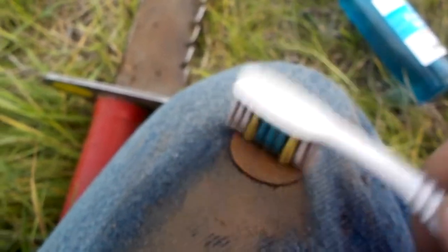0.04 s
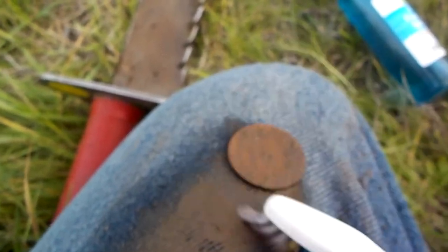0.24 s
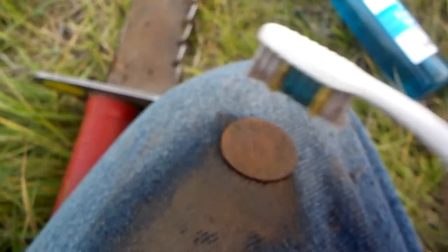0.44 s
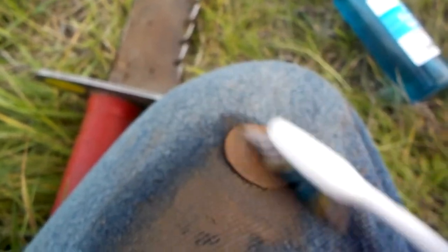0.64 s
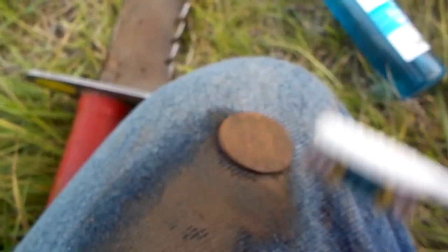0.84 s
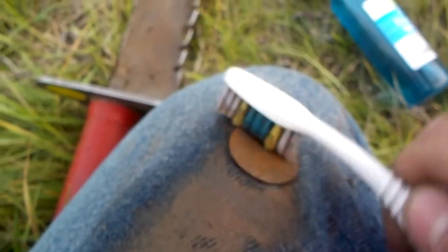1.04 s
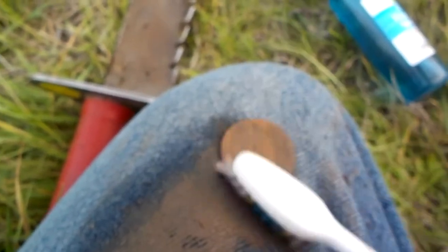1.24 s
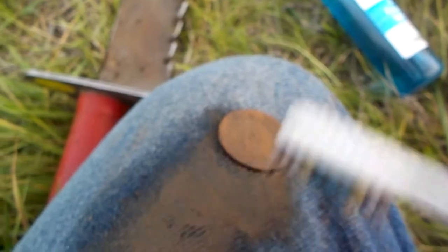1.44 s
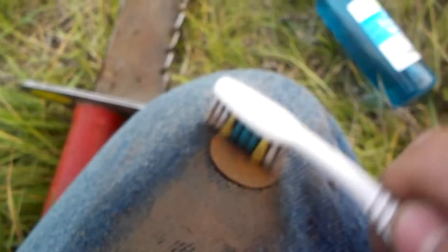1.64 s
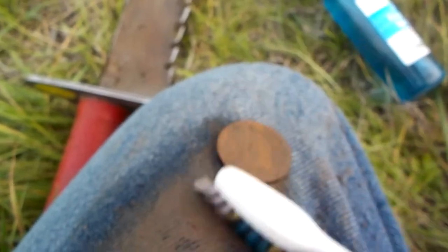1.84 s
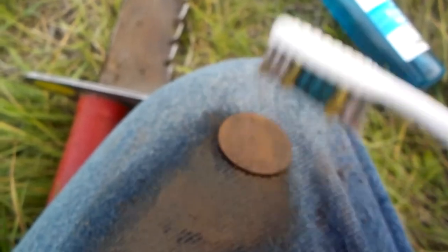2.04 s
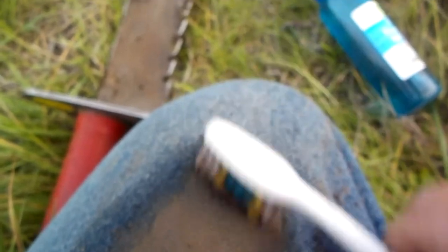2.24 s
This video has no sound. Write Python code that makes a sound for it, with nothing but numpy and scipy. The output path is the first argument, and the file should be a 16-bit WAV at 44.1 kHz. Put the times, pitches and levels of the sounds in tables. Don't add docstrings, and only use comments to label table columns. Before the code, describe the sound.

A toothbrush scrubs a small metal token on a denim-covered knee: four raspy strokes, each starting with a light tick and stopping abruptly, with a few sharp rim clicks. Close stereo microphones, quiet open field, faint hiss.

```python
import sys
import numpy as np
from scipy import signal
from scipy.fft import rfft, irfft, next_fast_len
from scipy.io import wavfile
from scipy.ndimage import uniform_filter1d

SR = 44100
rng = np.random.default_rng(int(sys.argv[2]) if len(sys.argv) > 2 else 0)


def inscribe(sig):
    pcm = np.round(np.clip(np.atleast_2d(sig).T, -1, 1) * 32767)
    wavfile.write(sys.argv[1], SR, pcm.astype(np.int16))


def convert_level_to_amplitude(level_db):
    exponent = np.asarray(level_db, float) / 20
    return 10 ** exponent


N = 101429

# frequency in Hz, level in dB per Hz.
CLOTH = [(150, -37), (350, -33.5), (700, -15), (1200, -4), (1600, -0.5), (2250, 2.5), (3000, -23.5),
         (5000, -25)]
# frequency in Hz, level in dB per Hz.
BRISTLE = [(2000, -40), (3100, -13.5), (3700, -7.5), (4300, 4), (4800, 2), (5600, -1.5), (6600, -4),
           (7800, -23)]
# frequency in Hz, level in dB per Hz.
FIZZ = [(5000, -26.5), (7900, -17.5), (9000, -3.5), (11500, -2), (13000, -3), (14700, 1.5), (15600, -1.5),
        (17000, -9.5)]


def rms_one(x):
    return x / np.sqrt(np.mean(x ** 2) + 1e-20)


def at_hz(points, hz):
    f, *columns = np.transpose(points)
    return [np.interp(np.log(hz + 1), np.log(f), column) for column in columns]


def white():
    return rng.standard_normal(N)


def drift(rate_hz):
    r = np.exp(-2 * np.pi * rate_hz / SR)
    slow = signal.lfilter([1], [1, -2 * r, r * r], rng.standard_normal(N + SR))
    return rms_one(slow[SR:])


def grains(per_s, spread_db):
    sizes = convert_level_to_amplitude(spread_db * np.minimum(rng.exponential(1, N), 3))
    signs = rng.choice([-1, 1], N)
    happens = rng.random(N) < per_s / SR
    return rms_one(sizes * signs * happens)


def colour(x, spectrum):
    size = 4096
    gain = convert_level_to_amplitude(at_hz(spectrum, np.fft.rfftfreq(size, 1 / SR))[0])
    cepstrum = irfft(np.log(rms_one(gain)))
    cepstrum[1:size // 2] *= 2
    cepstrum[size // 2 + 1:] = 0
    response = irfft(np.exp(rfft(cepstrum)))
    return signal.fftconvolve(x, response)[:N]


def pair(x, other, table):
    size = next_fast_len(N + 4096)
    db, phase, alike = at_hz(table, np.fft.rfftfreq(size, 1 / SR))
    alike = np.clip(alike, 0, 1)
    mid = np.sqrt((1 + alike) / 2) * rfft(x, size)
    side = np.sqrt((1 - alike) / 2) * rfft(other, size)
    turn = convert_level_to_amplitude(db / 2) * np.exp(.5j * phase)
    return irfft([(mid + side) / turn, (mid - side) * turn], size)[:, :N]


def ring(clicks, hz, t60):
    r, w = convert_level_to_amplitude(-60 / (t60 * SR)), 2 * np.pi * hz / SR
    return signal.lfilter([0, np.sin(w)], [1, -2 * r * np.cos(w), r * r], clicks + 1e-18)


def stroke_motion():
    # time in seconds, scrub level in dB, pressure into the knee in dB.
    strokes = [
        [(0.186, -70, -10), (0.192, -58.5, -2.5), (0.228, -53, -2), (0.236, -47.5, -6.5), (0.258, -52, -4.5),
         (0.27, -48, -7.5), (0.34, -49, 3), (0.408, -53, -4.5), (0.425, -92, -6)],
        [(0.626, -68, -5), (0.656, -62, -7), (0.678, -61.5, 1), (0.688, -54, -1), (0.798, -45.5, -1.5),
         (0.892, -51, 3), (0.92, -52.5, -5.5), (0.933, -80.5, -20)],
        [(1.15, -59, -6), (1.154, -68.5, 0), (1.24, -53, -6), (1.316, -51, 2), (1.344, -51.5, -4),
         (1.45, -51, 5), (1.502, -49.5, -6.5), (1.518, -59, 9), (1.528, -112, -12)],
        [(1.752, -67, 4), (1.762, -64.5, -7), (1.804, -54, 2.5), (1.902, -48.5, -7.5), (1.924, -51, -2.5),
         (2.028, -47, 1), (2.054, -53.5, -0.5), (2.066, -108, 19)],
        [(2.29, -68.5, 5.5), (2.3, -63, -1)],
    ]
    stroke_tips_db = [0.1, 0.1, 1, 0.11, 0.1]
    spring_db, spring_t60_s, spring_press_db = -35, 0.75, 2
    slow_ends_db = 5.5
    t = np.arange(N) / SR
    level_db, press_db, tips_db = np.full(N, -120.), np.zeros(N), np.zeros(N)
    for rows, tip_db in zip(strokes, stroke_tips_db):
        s, db, press = np.transpose(rows)
        before, during = t < s[0], t <= s[-1]
        after_db = db.max() + spring_db - 60 * (t - s[-1]) / spring_t60_s
        stroke_db = np.where(during, np.interp(t, s, db), after_db)
        stroke_press_db = np.where(during, np.interp(t, s, press), spring_press_db)
        along = np.clip(2 * (t - s[0]) / (s[-1] - s[0]) - 1, -1, 1)
        level_db = np.where(before, level_db, stroke_db)
        press_db = np.where(before, press_db, stroke_press_db)
        tips_db = np.where(before, tips_db, tip_db - slow_ends_db * along ** 2)
    return level_db, press_db, tips_db


def scrub(rim_snags):
    # frequency in Hz, level in dB per Hz.
    flesh = [(250, -19.5), (500, -5), (800, 2), (1200, 0), (1800, -14), (3000, -44)]
    slips_per_s, slip_spread_db, clump_db, clump_hz = 9000, 1.5, 1.33, 86.5
    flicks_per_s, flick_spread_db, flick_db = 1200, -1, -11
    cloth_db, bristle_db, fizz_db, knee_db = 1, -0.5, -3.5, -16
    fizz_follows, tips_press, knee_press = 0.97, 0.18, 0.63

    level_db, press_db, tips_db = stroke_motion()
    swing = drift(clump_hz)
    clump = convert_level_to_amplitude(clump_db * (swing - uniform_filter1d(swing, size=1500)))
    flicks = convert_level_to_amplitude(flick_db) * grains(flicks_per_s, flick_spread_db)

    def slips():
        return clump * grains(slips_per_s, slip_spread_db)

    cloth_drive = convert_level_to_amplitude(cloth_db + level_db + press_db) * (slips() + flicks)
    bristle_drive = convert_level_to_amplitude(bristle_db + level_db) * (slips() + flicks)
    fizz_level_db = fizz_db + tips_db + tips_press * press_db - 49.5 + fizz_follows * (level_db + 50.5)
    fizz_drive = convert_level_to_amplitude(fizz_level_db) * slips()
    knee_level_db = knee_db + level_db + knee_press * np.clip(press_db, -12, 4)
    knee_drive = convert_level_to_amplitude(knee_level_db) * (slips() + flicks)
    cloth = colour(cloth_drive + rim_snags, CLOTH)
    bristle = colour(bristle_drive + rim_snags, BRISTLE)
    return cloth + colour(knee_drive, flesh) + bristle + colour(fizz_drive, FIZZ)


def snags():
    # time in seconds, peak in dB.
    catches = [
        (0.2758, -31),
        (0.6903, -43),
        (0.802, -25),
        (0.8034, -25),
        (0.8724, -58),
        (1.191, -41),
        (1.4578, -30),
        (1.8018, -26),
        (1.9694, -30),
    ]
    s, db = np.transpose(catches)
    out = np.zeros(N)
    out[(s * SR).astype(int)] = convert_level_to_amplitude(db - 5)
    return out


def ticks():
    # start in seconds, level in dB, brightness in dB, swell in seconds.
    landings = [
        (.152, -53, 0.5, 0.003),
        (.157, -62, -2, 0.0095),
        (.1898, -61, -5, 0.0018),
        (0.6167, -46.5, 0, .0015),
        (.6895, -46.5, -2, .002),
        (1.1412, -55.5, 2, .003),
        (1.7425, -45, -1, .0015),
        (2.073, -60, -30, .005),
        (2.283, -56, -2, 0.0028),
    ]
    fade_s, tips_db, low_cut_hz = 0.0024, -14, 870
    heel_db, heel_softens_db_per_s = 24, 3000
    t, out = np.arange(N) / SR, 0
    cut = signal.butter(2, low_cut_hz, "high", fs=SR, output="sos")
    for s, db, bright_db, length in landings:
        swell = np.clip((t - s) / length, 0, 1)
        shape = swell * np.exp(-np.maximum(t - s - length, 0) / fade_s)
        touch = shape * white()
        touch[int((s + length) * SR)] = convert_level_to_amplitude(heel_db - heel_softens_db_per_s * length)

        def even(x):
            return x * np.sqrt(np.sum(shape ** 2) / np.sum(x ** 2))

        low = even(signal.sosfilt(cut, colour(touch, CLOTH)))
        mid = even(colour(touch, BRISTLE))
        high = even(colour(touch, FIZZ))
        out = out + convert_level_to_amplitude(db) * (low + convert_level_to_amplitude(bright_db) * (mid + convert_level_to_amplitude(tips_db) * high))
    return out


def brush():
    # frequency in Hz, right over left in dB, phase in radians, likeness from 0 to 1.
    sideways = [(400, -1, .05, .88), (1100, -.6, .08, .985), (2400, -2, .3, .95), (3100, 5, .1, .5),
                (4300, 2.5, .25, .97), (6300, 0, .9, .84), (7500, 0, .3, .95), (9300, 0, 1.2, .76),
                (11400, 5.5, 2.2, .89), (12800, 5.5, 1.4, .7), (15000, 3.3, 1.3, .91)]
    return pair(scrub(snags()) + ticks(), scrub(0), sideways)


def field():
    # frequency in Hz, level in dB per Hz.
    air = [(30, -35), (60, -49), (100, -22.5), (250, -8), (600, -1), (1100, -1), (2200, -3), (3200, -21)]
    # frequency in Hz, level in dB per Hz.
    hiss = [(300, -1), (2500, 8), (3300, 2.5), (4400, 5.5), (6000, 1.5), (9500, 0), (13000, 3.5),
            (16000, 3)]
    # frequency in Hz, width in Hz, level in dB.
    engine = [(96.8, 5.9, -89.5), (201.6, 12.4, -87)]
    # frequency in Hz, right over left in dB, phase in radians, likeness from 0 to 1.
    open_air = [(100, -1.5, 0.0087, 1), (564, -1.5, 0.028, 0.6), (1830, -1, 0.013, 0.87), (2550, 1.5, 0, 0),
                (4830, -0.5, 0.013, 0.33), (15000, 0, 0, 0.44)]
    air_db, hiss_db, patchy_db, patch_hz = -66.5, -68.5, 0.98, 7

    def wash():
        gusts = convert_level_to_amplitude(air_db + patchy_db * drift(patch_hz))
        return gusts * colour(white(), air) + convert_level_to_amplitude(hiss_db) * colour(white(), hiss)

    drone = sum(convert_level_to_amplitude(db) * rms_one(ring(white(), hz, 2.4 / width)) for hz, width, db in engine)
    return pair(wash() + drone, wash(), open_air)


def scene():
    return brush() + field()


def motor_notches(x):
    centres_hz = [1770, 2545, 2950, 4970, 7400, 8180]
    # width in Hz, depth in dB.
    notch_shapes = [(202, -11), (556, -38), (160, -2), (170, -25), (2140, -33), (1850, -25)]
    for hz, (width, depth_db) in zip(centres_hz, notch_shapes):
        r, c = np.exp(-np.pi * width / SR), np.cos(2 * np.pi * hz / SR)
        z = 1 - (1 - r) * convert_level_to_amplitude(depth_db)
        x = signal.lfilter([1, -2 * z * c, z * z], [1, -2 * r * c, r * r], x)
    return x


def roll_off(x):
    return signal.sosfilt(signal.butter(12, 16550, fs=SR, output="sos"), x)


def record(dry):
    rumble_cut_hz, top_cut_hz = 85, 15760
    mix = motor_notches(dry)
    mix = signal.sosfilt(signal.butter(3, rumble_cut_hz, "high", fs=SR, output="sos"), mix)
    mix = signal.sosfilt(signal.ellip(12, .5, 55, top_cut_hz, fs=SR, output="sos"), mix)
    return roll_off(mix)


dry = scene()
out = record(dry)
inscribe(out)
```